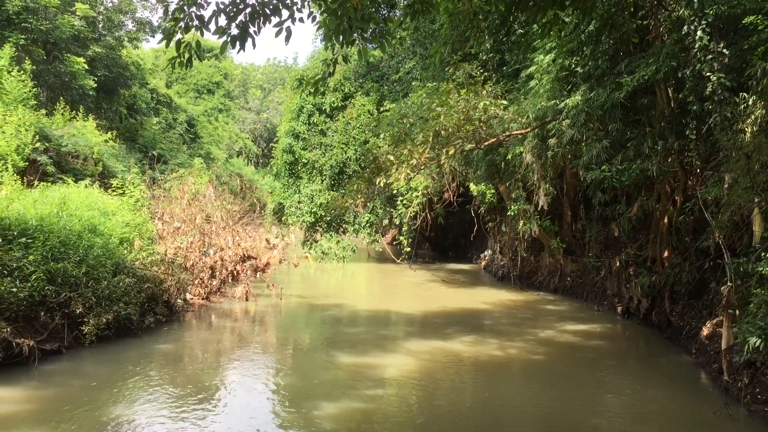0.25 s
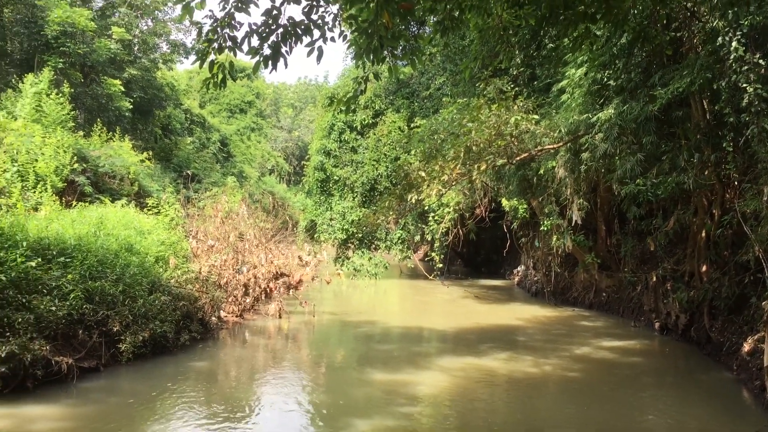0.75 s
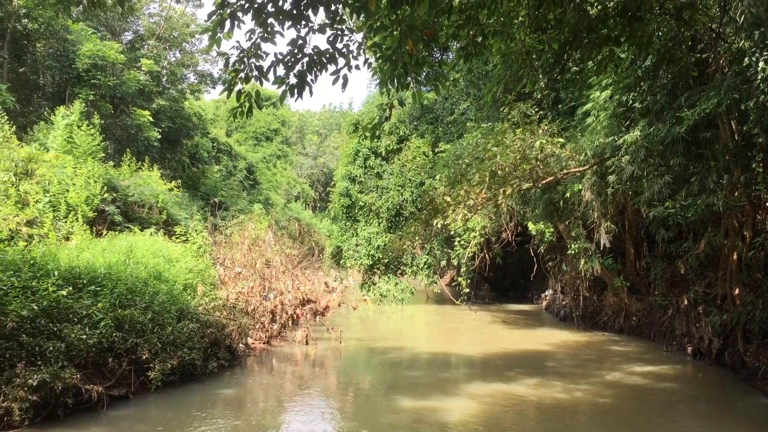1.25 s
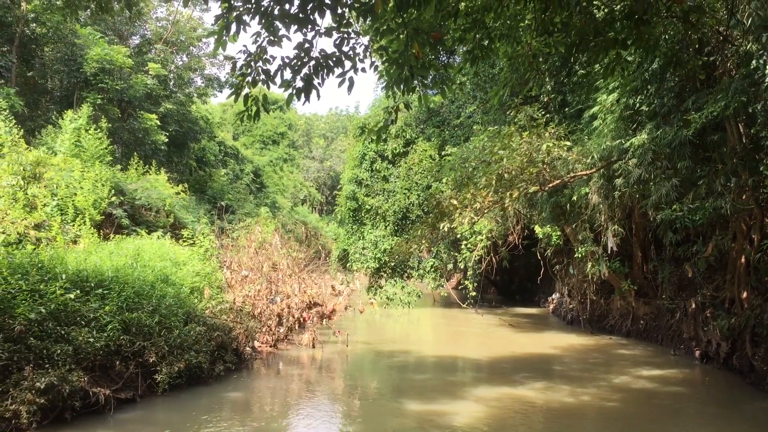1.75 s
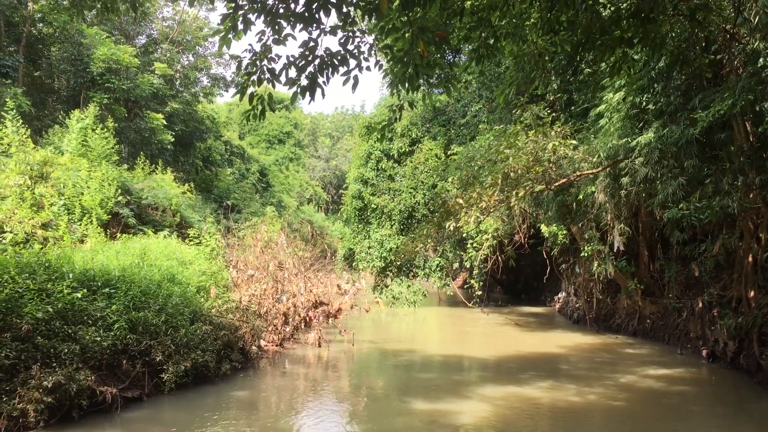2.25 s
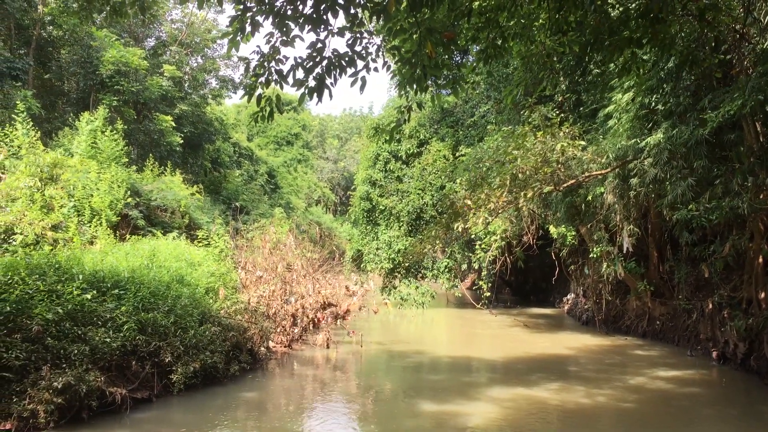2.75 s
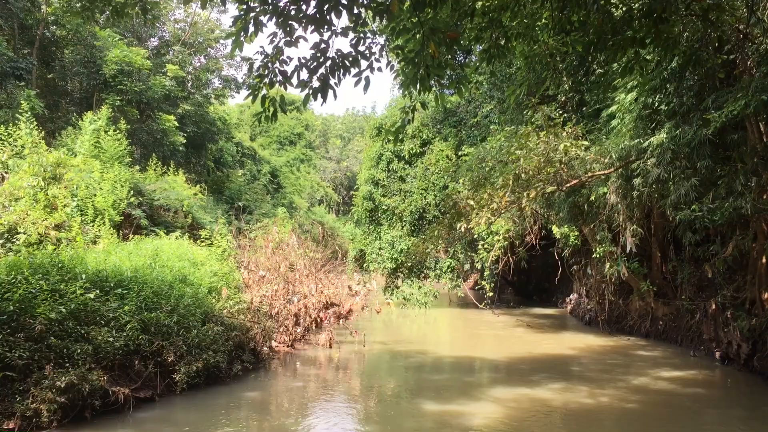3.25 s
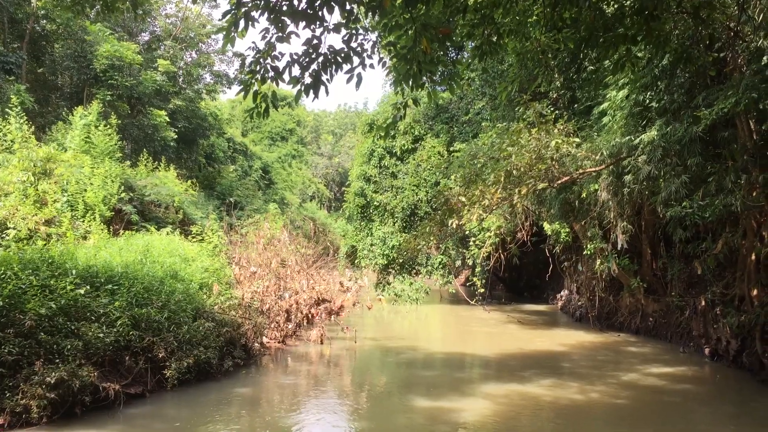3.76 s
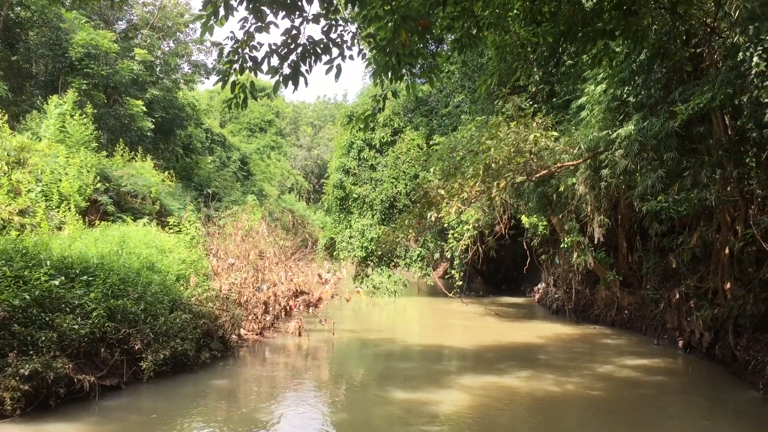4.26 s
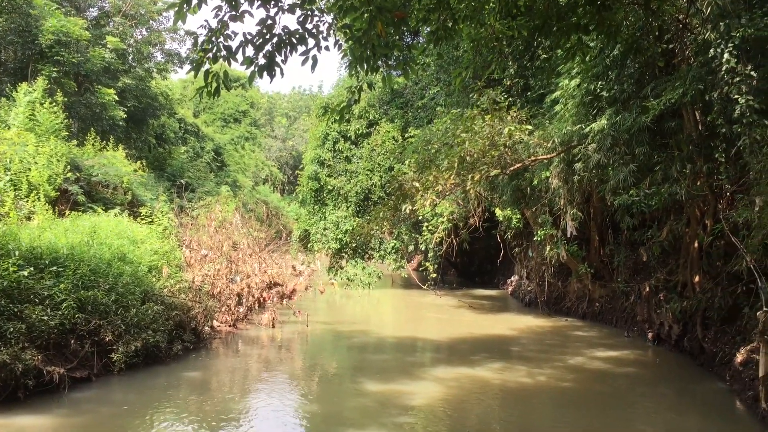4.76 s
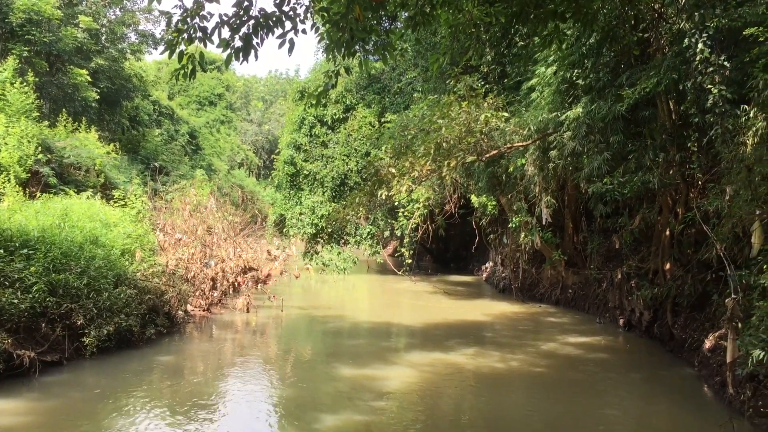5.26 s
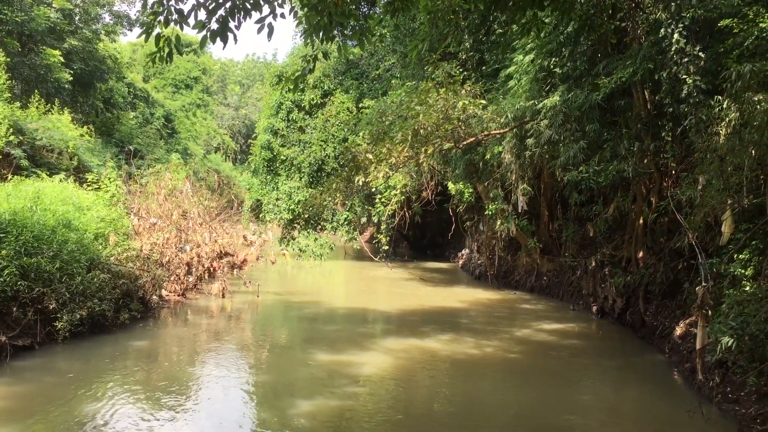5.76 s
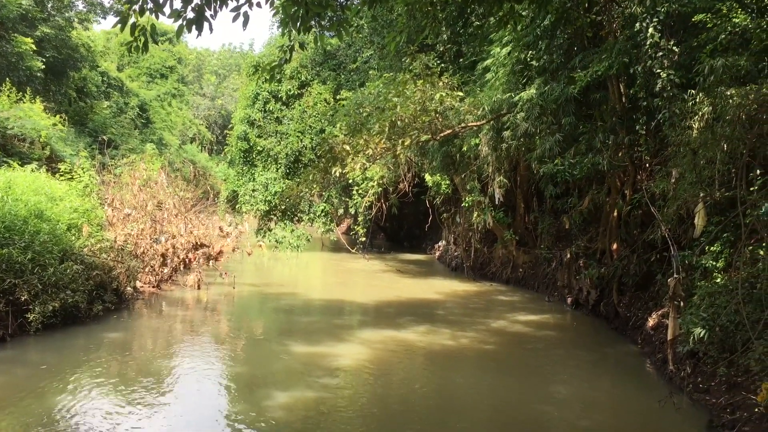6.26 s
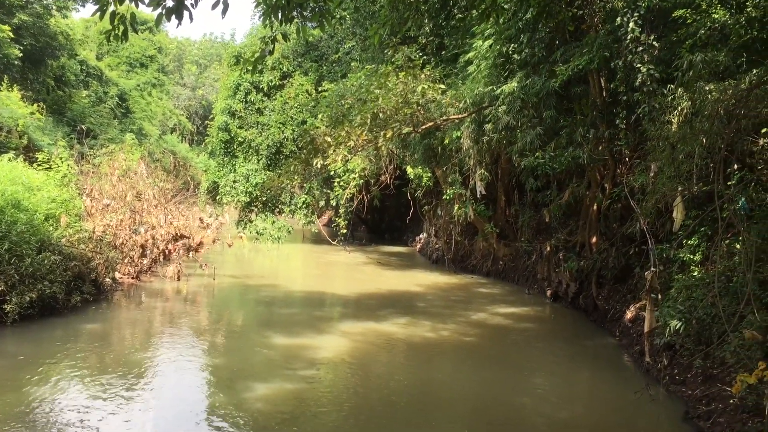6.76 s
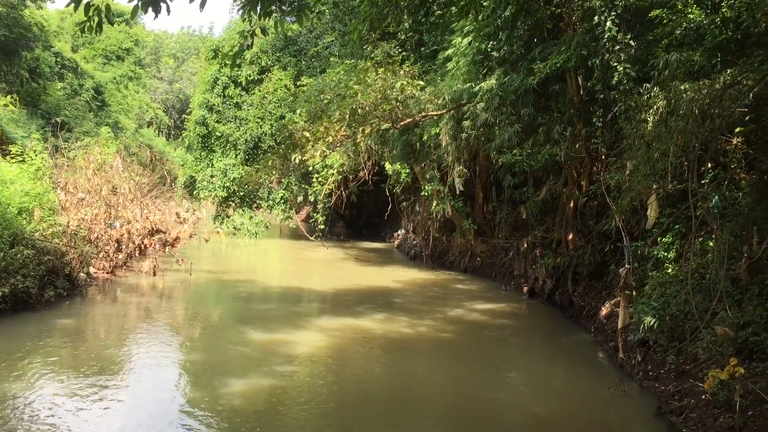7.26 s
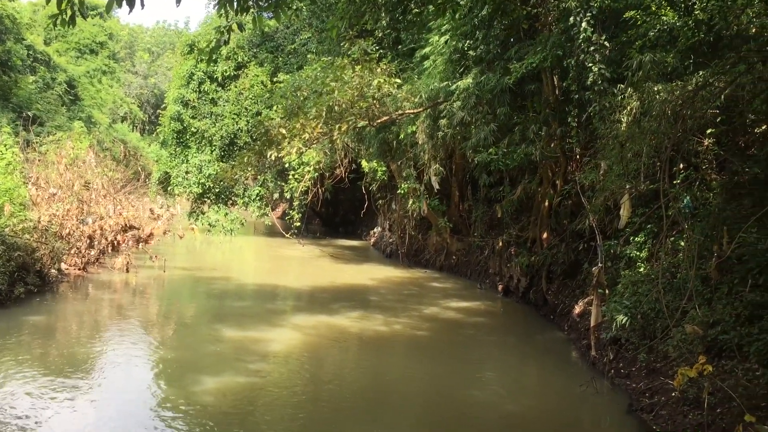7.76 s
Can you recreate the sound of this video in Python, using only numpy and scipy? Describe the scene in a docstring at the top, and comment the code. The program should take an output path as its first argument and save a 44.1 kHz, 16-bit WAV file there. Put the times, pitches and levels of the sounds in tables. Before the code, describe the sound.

Short runs of bright upward chirps from a bird echo off trees while distant engines throb low and insects pulse thinly behind.

```python
"""Bird trills beside a wooded creek

A bird trills in quick upward glides, tones shaped by a throat resonance and smeared by echoes off trees.
Crickets chirp as tones pulsed by wing strokes; a frog croaks in harmonics weighted by its vocal sac.
A far bird slurs upward in buzzy frequency-modulated tones, and a few ticks ring and snap nearby.
Two distant engines hum a few hertz apart and beat, over the filtered noise of air and microphone."""
import sys
import numpy as np
from scipy import signal
from scipy.fft import rfft, irfft
from scipy.io import wavfile
from scipy.ndimage import uniform_filter1d

SR = 44100
rng = np.random.default_rng(int(sys.argv[2]) if len(sys.argv) > 2 else 0)


def master_out(mix):
    """Clip the mix to full scale and print it as 16-bit PCM to the path in sys.argv[1]."""
    frames = np.transpose(np.atleast_2d(mix))
    ceiling = np.clip(frames, -1, 1)
    pcm = np.round(ceiling * 32767).astype(np.int16)
    wavfile.write(sys.argv[1], SR, pcm)


N = 353241
T = np.arange(N) / SR  # time axis, s


def undb(db):
    """Amplitude ratio from decibels: 20 dB is a factor of ten."""
    return 10 ** (np.asarray(db) / 20)


def level(x, db):
    """Scale to a root-mean-square level in dB."""
    return x * undb(db) / np.sqrt(np.mean(x ** 2))


def tone(hz):
    """Phase is the integral of frequency: a sine along a pitch curve, with random start phase."""
    return np.sin(2 * np.pi * (np.cumsum(hz) / SR + rng.random()))


def walk(rate):
    """Smoothed random process: levels held 1 / rate s and averaged twice over that time; spread near 1."""
    hold = int(SR / rate)
    steps = np.repeat(rng.standard_normal(N // hold + 1), hold)
    return 1.347 * uniform_filter1d(uniform_filter1d(steps, hold), hold)[:N]


def add(out, s, x):
    """Superposition: mix x into out from time s."""
    i = int(s * SR)
    out[i:i + len(x)] += x[:max(N - i, 0)]


def band(x, hz, width_hz):
    """Band-pass filtering by a bell-shaped weight on the spectrum."""
    f = np.arange(len(x) // 2 + 1) * SR / len(x)
    return irfft(rfft(x) * np.exp(-((f - hz) / width_hz) ** 2), len(x))


def engines():
    """Beating: two tones close in frequency drift in and out of phase, with a thrum an octave down."""
    # engine levels over time: time_s, steady_db, slower_db, thrum_db (rms; the thrum also wanders)
    engine_levels = [(0, -51.5, -55.5, -63), (.5, -52.5, -49.5, -56), (1, -48, -57, -68),
                     (1.5, -50, -52.5, -58), (2, -52, -53.5, -66), (2.5, -54.5, -56, -64),
                     (3.5, -52.5, -59, -76), (4, -55.5, -53, -72), (5, -53.5, -55.5, -69),
                     (5.5, -54.5, -52.5, -60.5), (5.999, -52, -52.5, -63), (6.5, -53, -62, -63),
                     (7, -54, -69, -68), (8.01, -53, -62, -66)]
    # how far the slower tone hunts below the steadier one, which is the beat rate: time_s, lag_hz
    lag = [(0, 7.55), (.27, 8.38), (.71, 5.31), (1.65, 7.13), (1.92, 8.85), (2.18, 3.92), (2.57, 7),
           (2.79, 5.37), (3.7, 4.57), (3.86, 7.83), (4.39, 7.56), (4.67, 8.11), (4.86, 2.75), (5.69, 3.83),
           (5.85, 6.44), (6.03, 4.09), (7.53, 6.02), (8.01, 3.66)]
    # weaker tones, both pitch and level wandering: pitch_hz, level_db (nominal rms)
    weak_tones = [(151, -74.5), (244.5, -71)]
    start_hz, sag_hz_per_s = 101.24, 0.1102  # the steadier engine
    first_cancel_s = .023  # the two tones stand in opposite phase here

    s, *columns = np.transpose(engine_levels)
    steady_db, slower_db, thrum_db = (np.interp(T, s, c) for c in columns)
    turns = np.cumsum(start_hz - sag_hz_per_s * T + 0.37 * walk(1.973)) / SR
    slip = np.cumsum(np.interp(T, *np.transpose(lag))) / SR
    slip = slip - slip[int(first_cancel_s * SR)]
    out = undb(steady_db) * np.sin(2 * np.pi * turns)
    out = out - undb(slower_db) * np.sin(2 * np.pi * (turns - slip))
    out = out + undb(thrum_db + 3 * walk(6)) * np.sin(np.pi * turns)
    for hz, db in weak_tones:
        out = out + undb(db + 3.2 * walk(12)) * tone(hz + .6 * walk(2))
    return np.sqrt(2) * out  # a sine's peak is sqrt(2) times its rms


def air():
    """Spectral shaping of noise: rumble and hiss, each octave swelling alone; the microphone dips near 10 kHz."""
    # spectral density before the whole is set to its level: pitch_hz, density_db (per Hz, relative)
    air_curve = [(15, -37), (30, -16.5), (42, -11), (65, 2), (110, -1.5), (170, -10.5), (260, -14),
                 (400, -22.5), (700, -25.5), (2500, -30.5), (4900, -36.5), (7500, -40.5), (9500, -39.5),
                 (10500, -45.5), (11500, -41.5), (16000, -42.5)]
    air_db = -58  # rms

    f = np.arange(N // 2 + 1) * SR / N + 1  # 1 Hz up, to keep the logarithm finite
    fh, db = np.transpose(air_curve)
    spectrum = rfft(rng.standard_normal(N)) * undb(np.interp(np.log(f), np.log(fh), db))
    out = 0
    for octave in range(4, 16):
        share = np.clip(1 - np.abs(np.log2(f) - octave), 0, 1)
        swell = undb((1.0 + 14 / octave ** 2.0) * walk(5))  # low octaves swell most
        out = out + irfft(spectrum * share, N) * swell
    return level(out, air_db)


def far_crickets():
    """Many unresolved sources merge into narrow-band noise: a chorus that wavers and slowly grows."""
    # chorus bands: pitch_hz, width_hz, level_db (rms)
    chorus = [(6175, 530, -82.5), (6800, 400, -89)]
    out = 0
    for hz, width_hz, db in chorus:
        swell = undb(1.6 * walk(9) + 0.25 * T)
        out = out + level(band(rng.standard_normal(N), hz, width_hz) * swell, db)
    return out


def crickets():
    """Stridulation: each chirp is a run of wing strokes that pulse a tone whose pitch creeps up."""
    # two crickets: wing_hz (nominal, at 0 s), rise_hz (per s), chirps;
    # chirps: start_s, level_db (before the envelope), length_s
    cricket_table = [(6103, 30, [(0.183, -59, 0.069), (0.849, -61, 0.074), (1.499, -59, 0.09),
                     (2.166, -59, 0.073), (2.68, -62, .057), (3.329, -62, 0.08), (3.991, -63, 0.076),
                     (4.504, -61.5, 0.086), (5.183, -59.5, 0.074), (5.71, -64.5, 0.083), (6.22, -68, 0.065),
                     (6.72, -65, .08), (7.231, -64.5, 0.058), (7.55, -75, 0.12), (7.896, -68.5, 0.075)]),
                     (6710, 31, [(0.204, -64.5, .08), (0.477, -65.5, 0.055), (0.769, -66, .023),
                     (0.998, -65.5, 0.064), (1.401, -63, 0.063), (1.82, -71, 0.042), (2.088, -69, 0.044),
                     (2.357, -66, 0.023), (2.629, -63, 0.064), (3.02, -63.5, .057), (3.94, -63, 0.034),
                     (4.385, -66.5, 0.037), (4.656, -66, 0.039), (5.057, -64, 0.049), (5.473, -67, 0.051),
                     (5.8, -73, .028), (6.013, -71, .04), (6.288, -73, .034), (6.549, -69, 0.036),
                     (6.815, -72, 0.046), (7.09, -72, .038), (7.37, -73, .034), (7.738, -71, 0.036)])]
    stroke_hz, wing_scatter_hz = 77.5, 35  # strokes a second; spread of pitch between chirps

    out = np.zeros(N)
    for wing_hz, rise_hz, chirps in cricket_table:
        for at, db, length in chirps:
            t = T[:int(length * SR)]
            hz = wing_hz + rise_hz * at + wing_scatter_hz * rng.standard_normal()
            strokes = .15 + np.abs(np.sin(np.pi * stroke_hz * t)) ** 3
            # pitch rises within each stroke as well as along the chirp
            pitch = hz * (1 + 0.025 * (t / length - .5) + 0.027 * (stroke_hz * t % 1 - .5))
            envelope = np.sin(np.pi * (t / length) ** 1.6) ** .5
            add(out, at, undb(db) * envelope * strokes * tone(pitch))
    return out


def trees(x):
    """Reverberation: a dense, decaying cloud of echoes from trunks and leaves, of unit total energy."""
    t60_s, rise_s = 0.54, .012  # time to decay by 60 dB; time constant of the build-up
    t = T[:SR]
    echoes = rng.standard_normal(SR) * (1 - np.exp(-t / rise_s)) * np.exp(-np.log(1000) * t / t60_s)
    return signal.fftconvolve(x, echoes / np.sqrt(np.sum(echoes ** 2)))[:N]


def trill():
    """Source and filter: each note follows one upward glide, up to a ceiling, through a throat resonance."""
    # path of every whistle at a reach of 1: time_s (from the 3.6 kHz point), pitch_hz
    glide_path = [(-.024, 1930), (-.015, 2538), (-.008, 2924), (-.004, 3185), (0, 3600), (.003, 3850),
                  (.006, 4170), (0.013, 4620)]
    # throat response at a reach of 1: pitch_hz, gain_db
    throat_curve = [(1900, -5), (2500, -6.5), (3000, -6.5), (3600, 2), (4100, -13.5), (4900, -4)]
    # trills: first_hz (aim of the first note), settled_hz (aim approached later), notes;
    # notes: time_s (passing 3.6 kHz), level_db (before the throat)
    trills = [(4620, 3920, [(1.254, -51.5), (1.322, -49.5), (1.385, -47), (1.447, -45), (1.507, -45),
              (1.567, -43), (1.627, -44), (1.686, -53.5)]), (4395, 3900, [(1.931, -51), (1.996, -47),
              (2.060, -44.5), (2.122, -45), (2.186, -43), (2.245, -41.5), (2.304, -45), (2.36, -63)]),
              (4510, 4000, [(4.824, -55.5), (4.890, -48.5), (4.952, -46.5), (5.011, -44.5), (5.071, -44),
              (5.128, -43.5), (5.186, -52.5)]), (4346, 3950, [(5.455, -57.5), (5.525, -50), (5.591, -47.5),
              (5.653, -44.5), (5.714, -43.5), (5.773, -42.5), (5.833, -44), (5.892, -51)]),
              (4426, 4750, [(7.774, -57.5), (7.810, -54), (7.842, -55), (7.878, -51.5), (7.909, -53.5),
              (7.942, -51.5), (7.979, -48)])]
    settle_notes = 2.5  # notes over which the aim settles
    hold_s = 0.0036  # fade-out while a note dwells on its ceiling
    # a note at full_db nominally starts from full_low_hz; softer ones start higher; each scatters
    full_db, full_low_hz, low_hz_per_db, low_scatter_hz = -42, 2230, 42.5, 130
    first_lift_hz = 320  # extra lift of a trill's opening note

    out = np.zeros(N)
    s, f = np.transpose(glide_path)
    fh, db = np.transpose(throat_curve)
    t = np.arange(s[0], .04, 1 / SR)
    for first_hz, settled_hz, notes in trills:
        for k, (at, note_db) in enumerate(notes):
            aim_hz = settled_hz + (first_hz - settled_hz) * np.exp(-k / settle_notes)
            low_hz = full_low_hz + low_hz_per_db * (full_db - note_db)
            low_hz = low_hz + first_lift_hz * (k == 0) + low_scatter_hz * rng.standard_normal()
            # a note that aims higher is flung up faster, through a wider beak that lifts the resonance
            reach = aim_hz / 4100
            glide = np.interp(t * reach ** 2.67, s, f)
            hz = np.minimum(glide, aim_hz - 80)
            throat = undb(np.interp(np.log(hz / reach), np.log(fh), db))
            held = np.cumsum(glide > hz) / SR
            onset = np.clip((hz - low_hz) / 260, 0, 1)
            release = np.cos(np.pi / 2 * np.clip(held / hold_s, 0, 1)) ** 2
            add(out, at + s[0], undb(note_db) * throat * onset * release * tone(hz))
    return out


def near_echoes(x):
    """Early reflection: delayed copies off the water and the nearest leaves thicken each note."""
    # reflections: delay_s, gain_db
    reflections = [(.0031, -7), (.0058, -6), (.0094, -10)]
    return sum(undb(db) * np.roll(x, int(lag * SR)) * (T > lag) for lag, db in reflections)


def frog():
    """Formants: harmonics of a wobbling pulse rate, weighted by the vocal sac and a lower throat ring."""
    # croaks: start_s, level_db (before the harmonics are weighted and summed), sac_hz (resonance)
    croaks = [(1.919, -69, 1420), (1.959, -67.5, 1830), (2.012, -66.5, 1920), (2.481, -62, 1840),
              (2.525, -65, 1750), (2.582, -65, 1760), (2.645, -67, 1630), (6.376, -60, 2010),
              (6.41, -62, 2000), (6.647, -57.5, 2300), (6.682, -61, 2120), (6.904, -62, 1700),
              (6.932, -66.5, 1810), (7.226, -61.5, 1960), (7.26, -63, 1950)]
    pulse_hz, croak_s, wobble_depth = 214.1, 0.031, .035  # mean pulse rate, length, relative wobble
    sac_width_hz, ragged_db = 290, 3

    out, wobble = np.zeros(N), 1 + wobble_depth * walk(100)
    n, k = int(croak_s * SR), np.arange(4, 18)[:, None]  # samples, harmonic numbers
    for at, db, sac_hz in croaks:
        i = int(at * SR)
        sac = 1 / (1 + ((k * pulse_hz - sac_hz) / sac_width_hz) ** 2)
        throat = 0.091 / (1 + ((k * pulse_hz - 1250) / 200) ** 2)
        # bounces off bank and water favour some harmonics
        weight = (sac + throat) * undb(ragged_db * rng.standard_normal(k.shape))
        turns = k * np.cumsum(pulse_hz * wobble[i:i + n]) / SR + 0.29 * rng.standard_normal(k.shape)
        pulses = np.sum(weight * np.cos(2 * np.pi * turns), axis=0)
        add(out, at, undb(db) * np.hanning(n) ** 0.25 * pulses)
    return out


def far_bird():
    """Frequency modulation: rising slurs buzz at 60 Hz, flicker in level and fade in and out."""
    # slurs: start_s, end_s, from_hz, to_hz, level_db (before fades and flicker)
    slurs = [(2.3, 2.52, 3900, 6600, -75), (2.56, 2.78, 4000, 7000, -73.5), (2.8, 3.08, 3650, 6800, -74.5)]
    out = np.zeros(N)
    for t0, t1, from_hz, to_hz, db in slurs:
        n = int((t1 - t0) * SR)
        hz = np.linspace(from_hz, to_hz, n) + 320 * tone(np.full(n, 60.))
        add(out, t0, undb(db) * np.hanning(n) ** 0.15 * tone(hz))
    return out * undb(3 * walk(90))


def ticks():
    """Damped oscillation: a brief decaying ring with two thin noise snaps on top."""
    # ticks, levels before rise and decay: start_s, ring_db, ring_hz,
    # mid_db (rms of the 3 kHz snap), top_db (rms of the 9 kHz snap)
    tick_table = [(3.021, -57, 1880, -67, -85), (3.799, -63, 3510, -72, -87),
                  (5.646, -47, 1856, -52, -66.5), (6.7307, -53, 2250, -62, -67.5),
                  (6.743, -50, 1420, -59.5, -74), (6.8226, -67, 2180, -67, -79)]
    out, t = np.zeros(N), T[:1200]
    for at, db, hz, mid_db, top_db in tick_table:
        ring = undb(db) * np.sin(2 * np.pi * hz * t) * (1 - np.exp(-t / 0.00076)) * np.exp(-t / 0.0049)
        mid = level(band(rng.standard_normal(len(t)), 2960, 1060), mid_db)
        top = level(band(rng.standard_normal(len(t)), 8850, 1100), top_db)
        add(out, at, ring + (mid + top) * np.exp(-t / 0.0094))
    return out


def scene():
    """Superposition of direct sound, early reflections, reverberation and background."""
    bird, small = trill(), crickets() + frog()
    # the middle of each whistle, near 3.5 kHz, comes straight;
    # a wider band of pitches arrives by way of the trees
    straight = undb(1) * band(bird, hz=3550, width_hz=850)
    wide = undb(5.5) * band(bird, hz=3950, width_hz=1900)
    direct = straight + small + near_echoes(straight)
    wet = trees(wide + undb(-10) * small + far_bird())
    background = engines() + air() + far_crickets()
    return (direct + wet + ticks() + background)[None, :]


def record(dry):
    """Low-pass filtering: the recorder cuts steeply above 15.76 kHz."""
    low_pass = signal.ellip(14, .2, 60, 15760, fs=SR, output="sos")  # order, ripple dB, stop dB, Hz
    return signal.sosfilt(low_pass, dry)


dry = scene()
out = record(dry)
master_out(out)
```